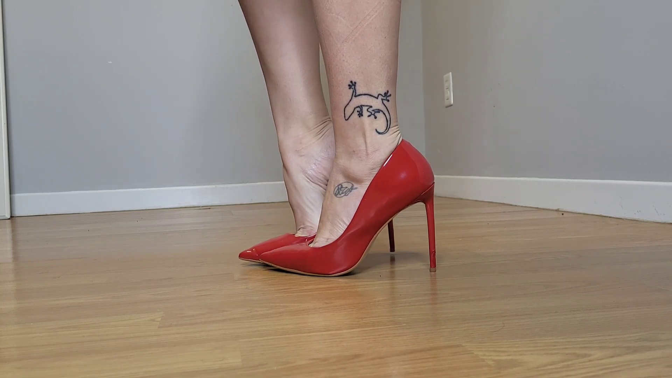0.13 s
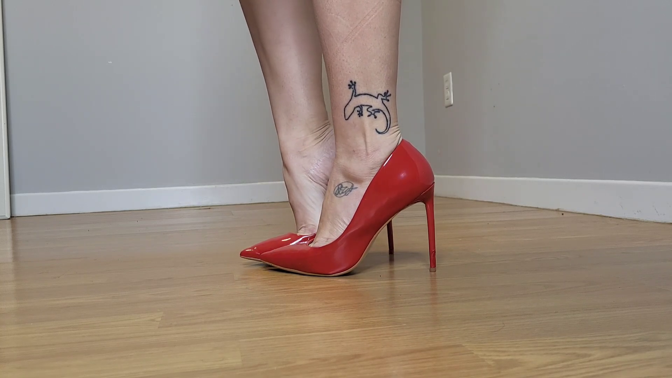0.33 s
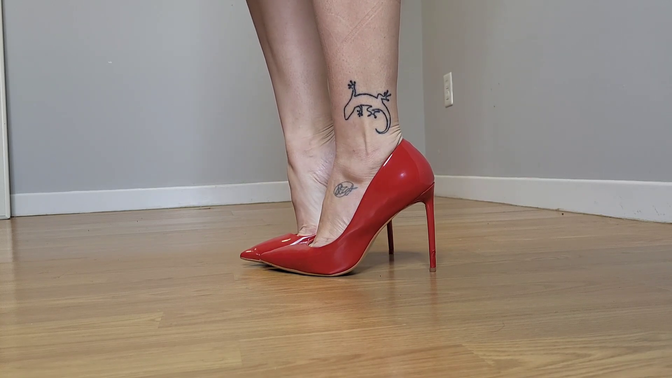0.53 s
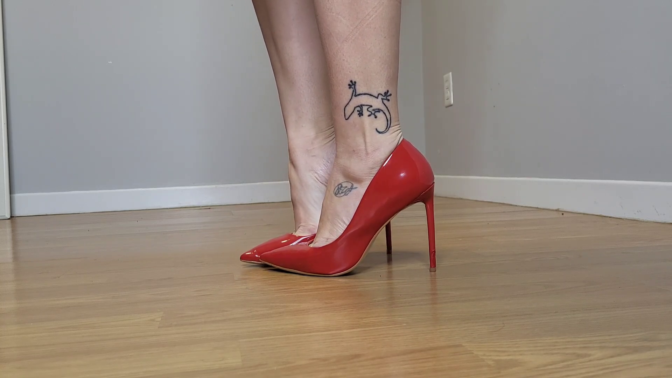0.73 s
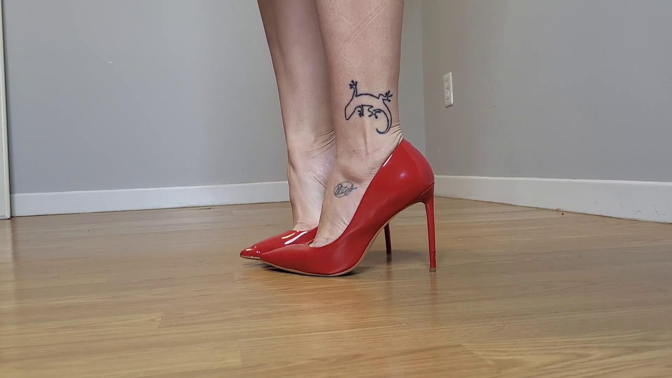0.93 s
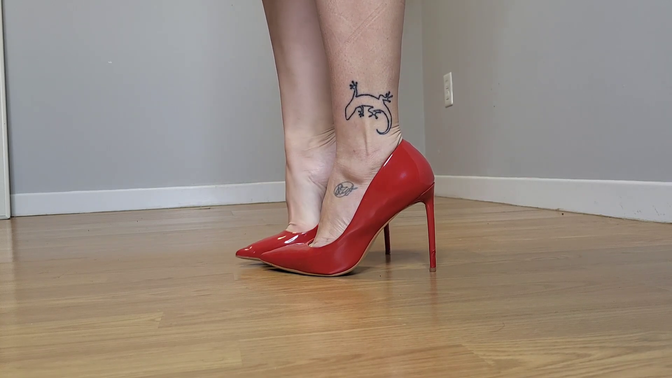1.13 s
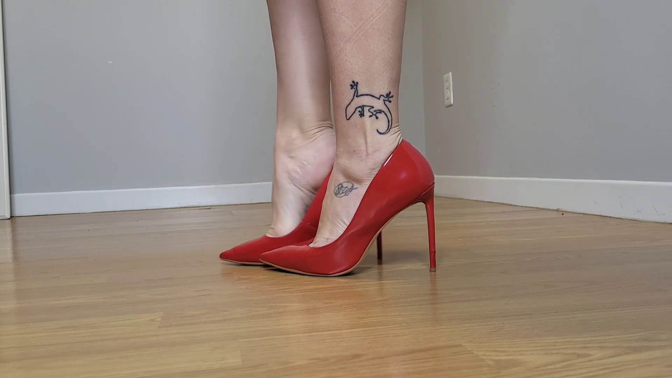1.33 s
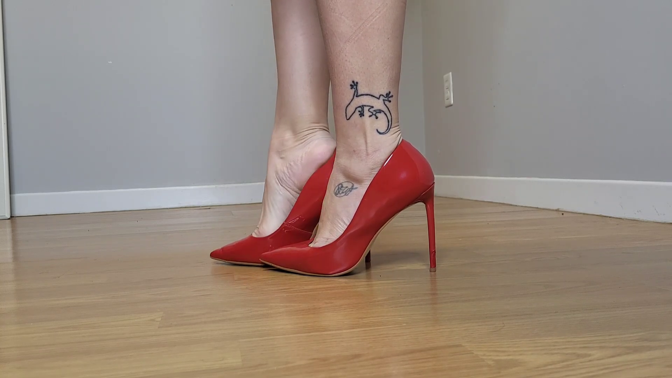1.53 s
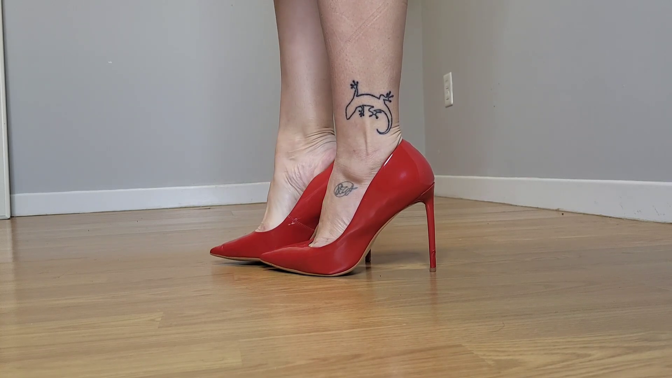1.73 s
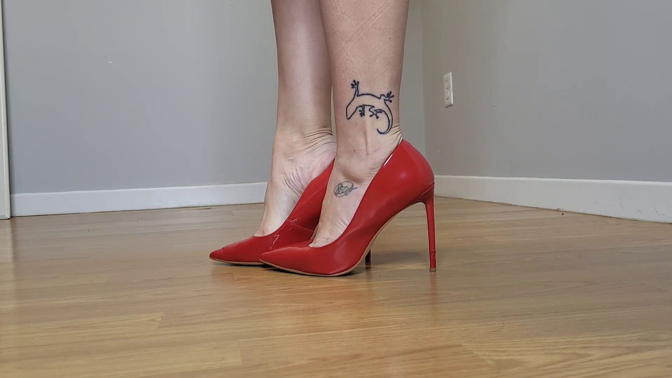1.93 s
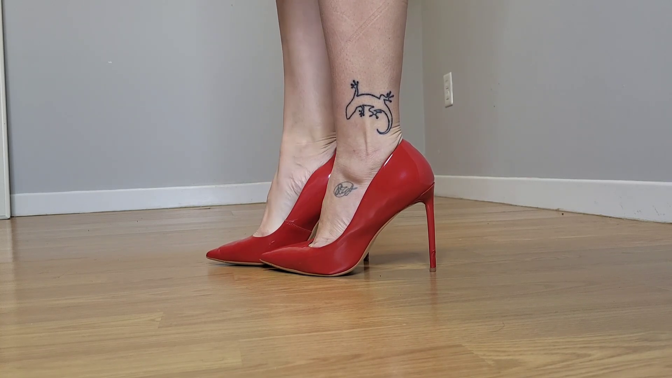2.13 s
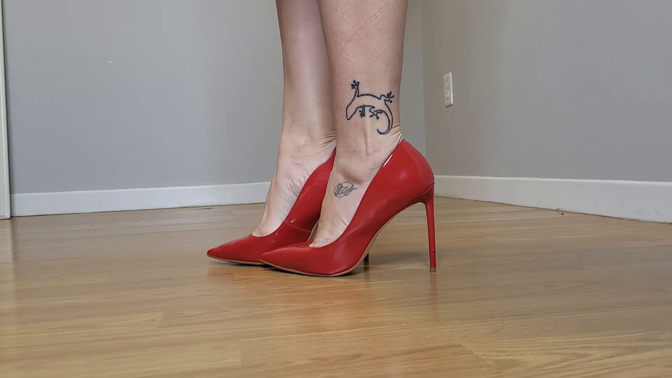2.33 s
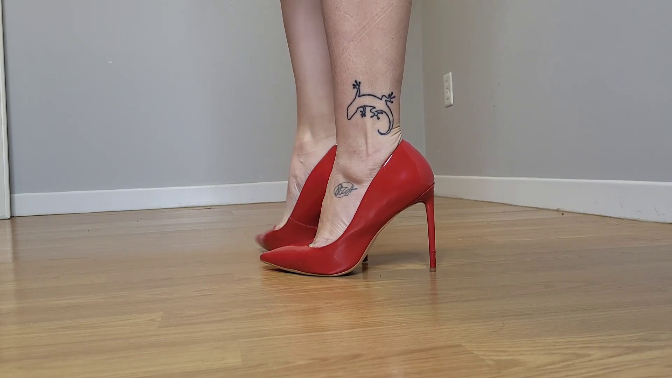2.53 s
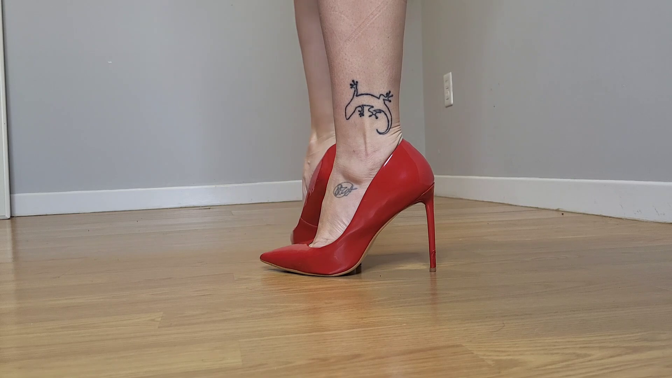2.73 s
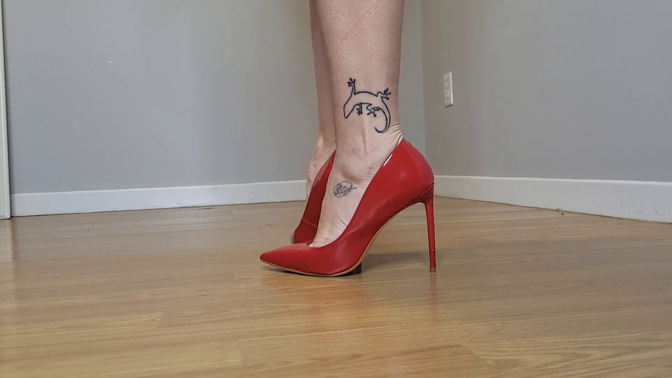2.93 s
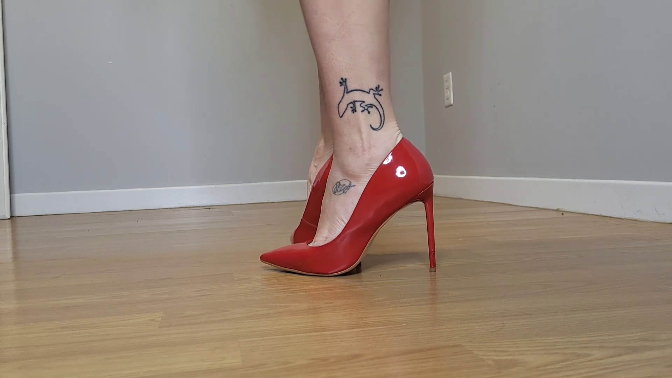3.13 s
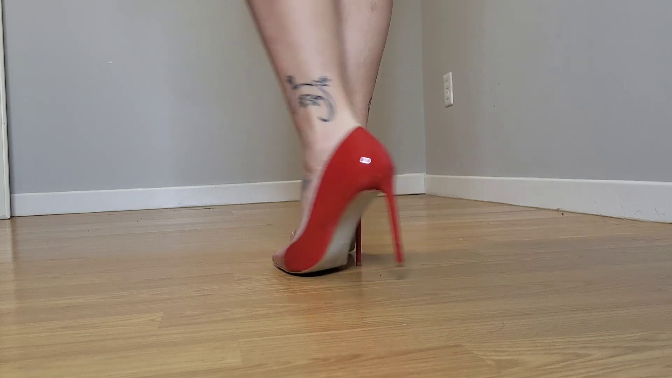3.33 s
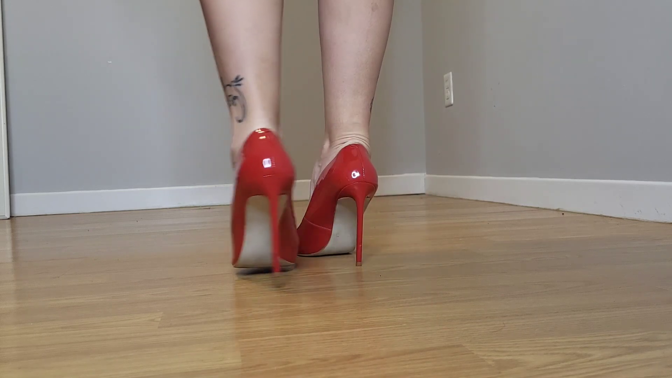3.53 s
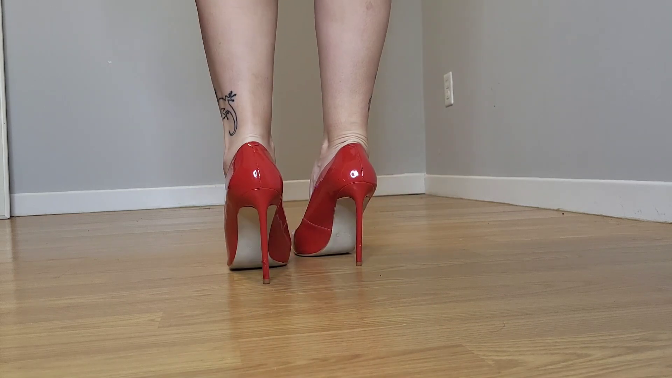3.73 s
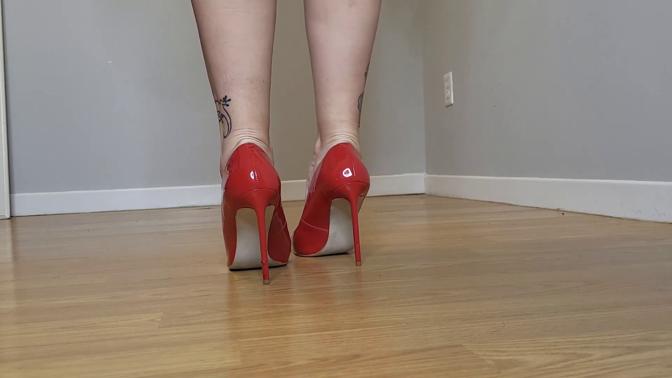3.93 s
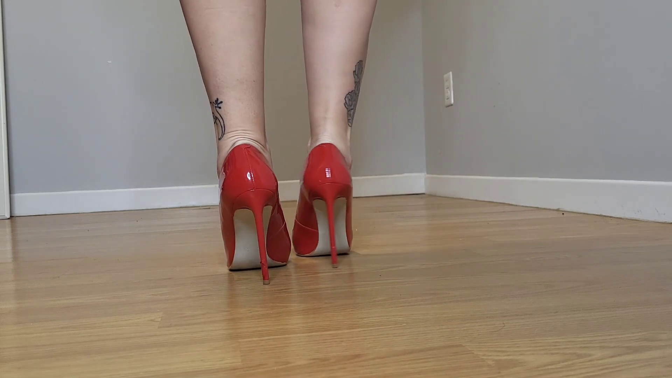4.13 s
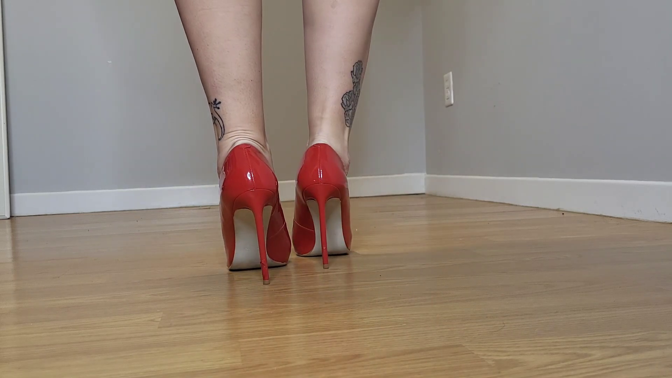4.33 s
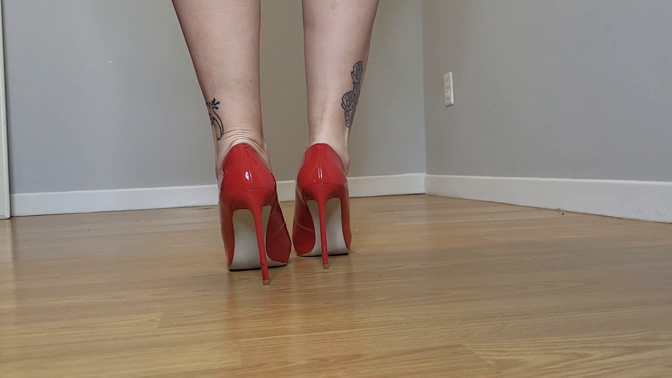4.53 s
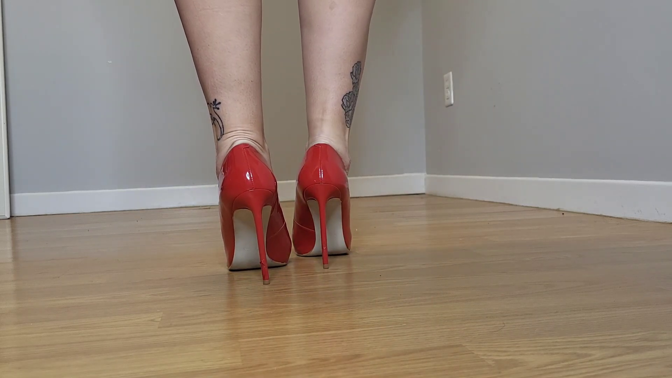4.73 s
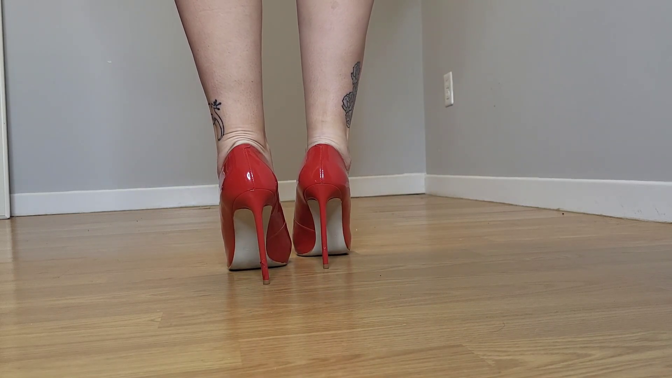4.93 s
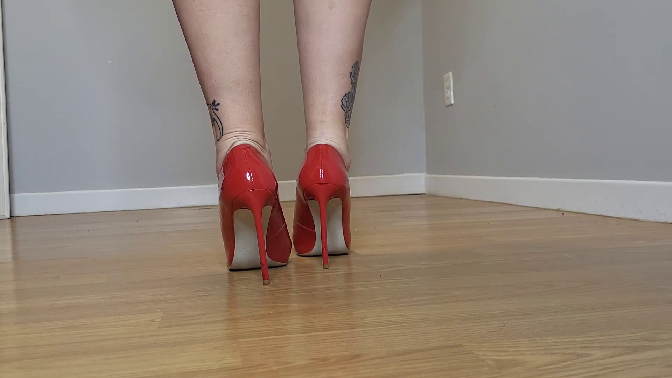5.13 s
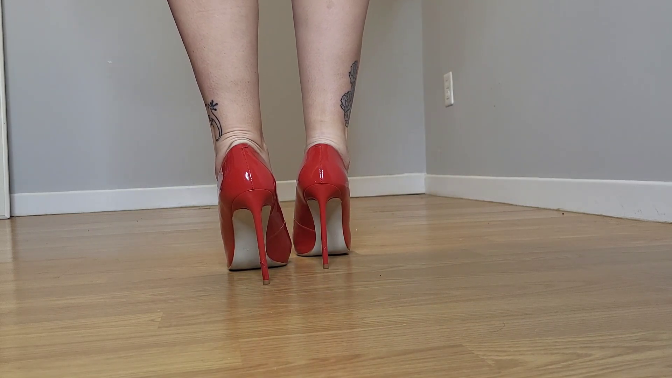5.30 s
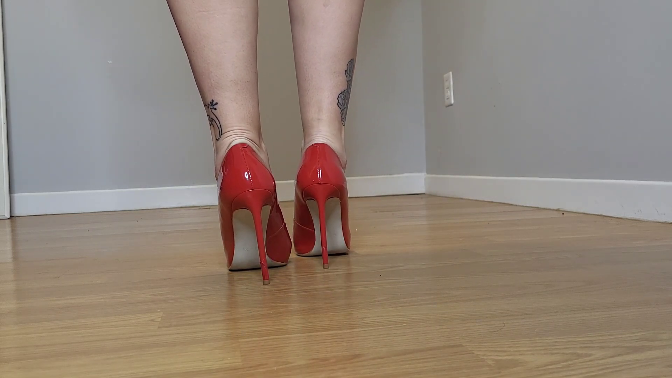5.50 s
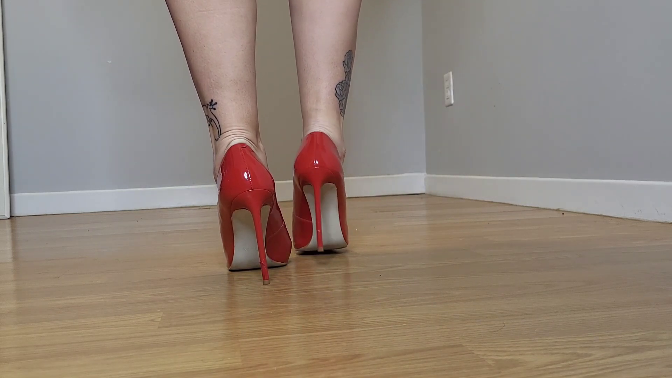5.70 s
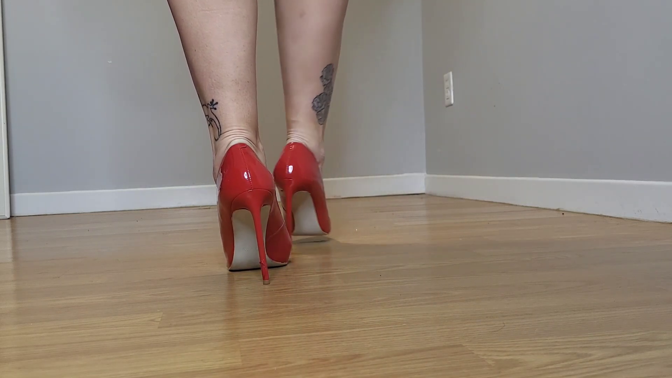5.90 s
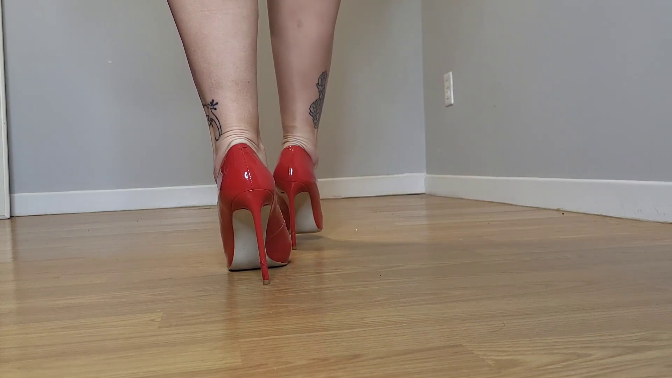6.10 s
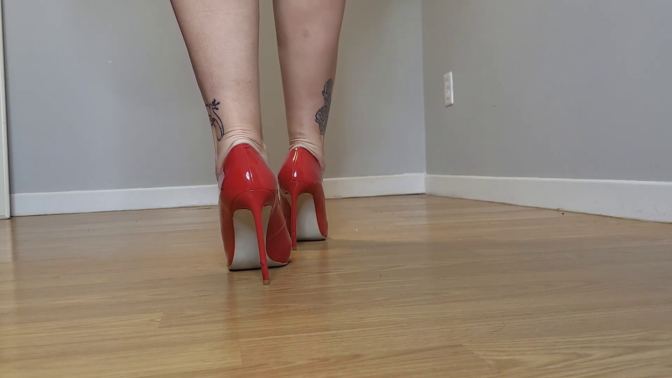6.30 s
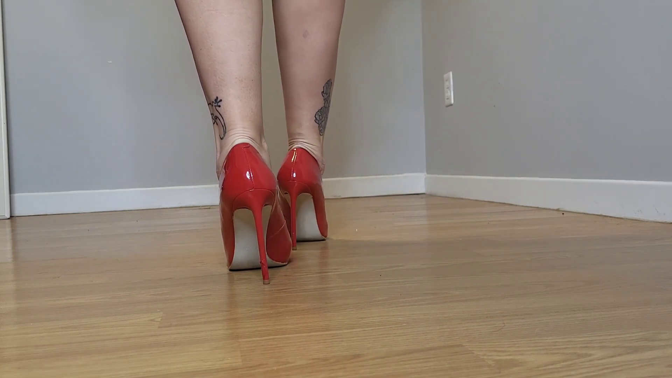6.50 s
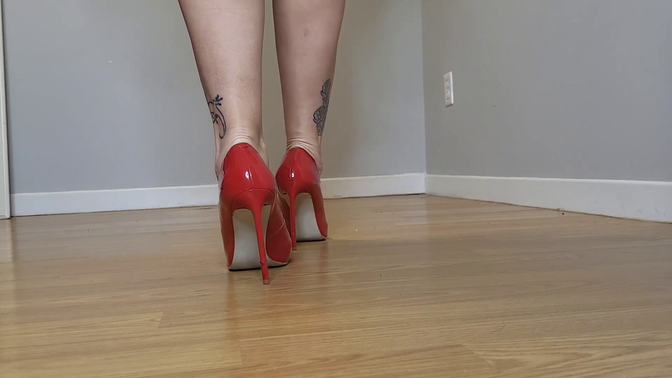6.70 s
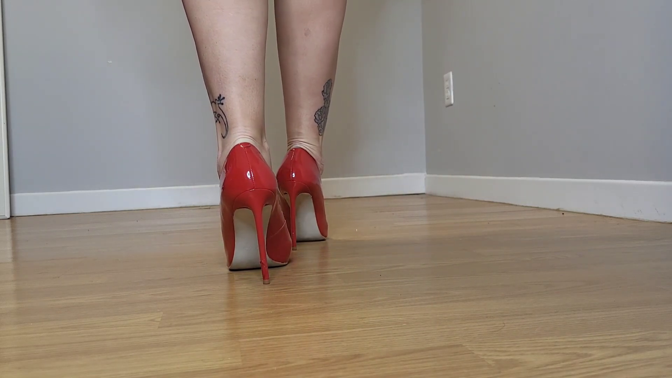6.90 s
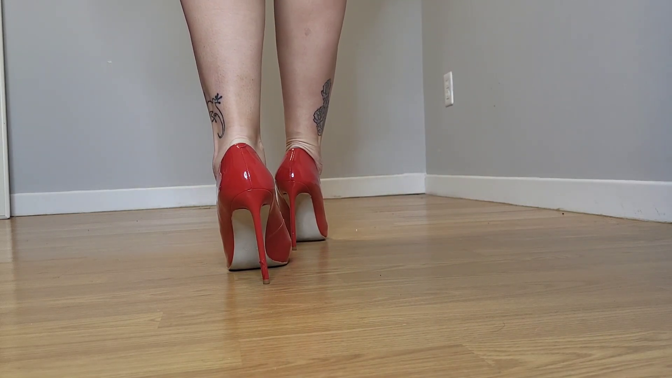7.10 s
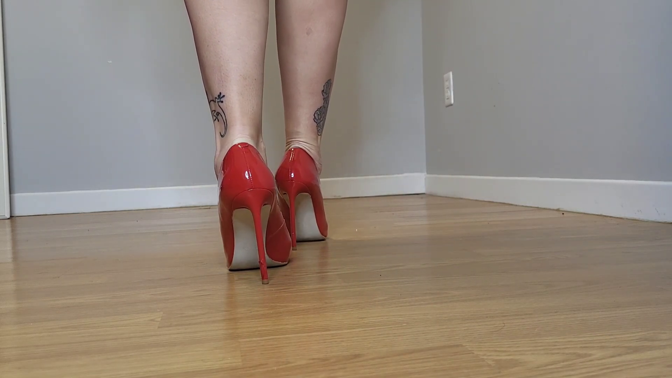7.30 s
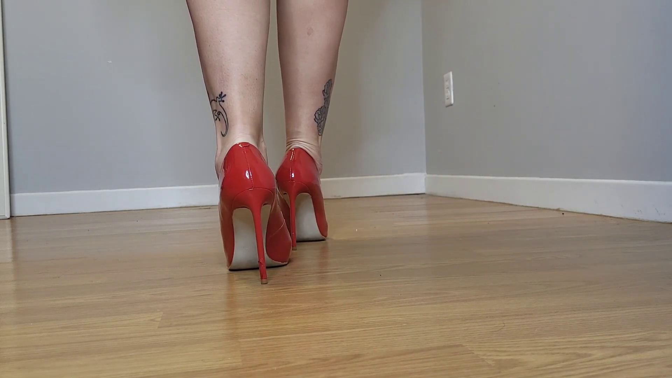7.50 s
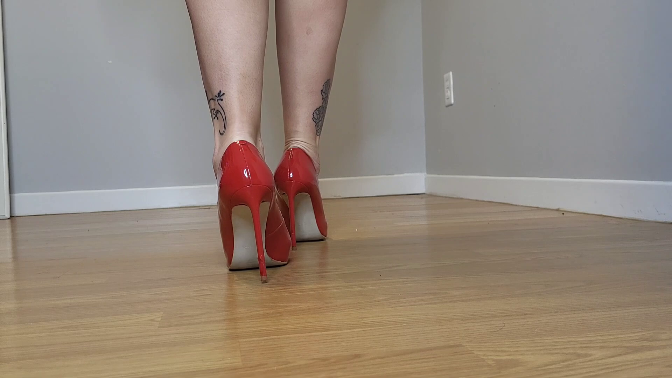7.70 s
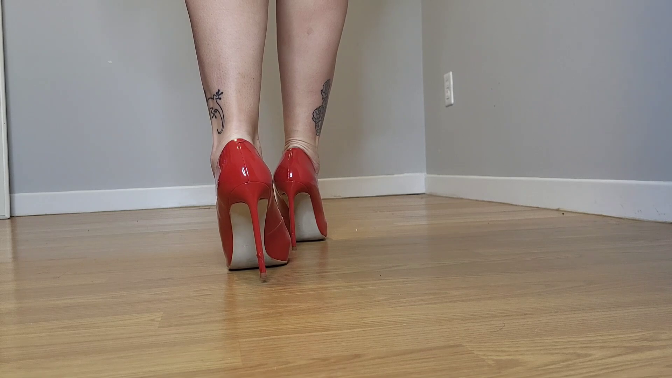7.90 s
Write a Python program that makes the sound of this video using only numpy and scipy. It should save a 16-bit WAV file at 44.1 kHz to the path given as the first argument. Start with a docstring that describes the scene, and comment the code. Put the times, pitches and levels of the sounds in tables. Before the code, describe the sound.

Stiletto heels tap and thump unevenly on hollow indoor boards, soles dragging briefly between steps, over faint room rumble and hiss.

```python
"""Bare room, hollow laminate floor: feet work their way into high-heeled shoes, then turn and step.
Heel tips and soles ring modes of shoe and plank (tick, knock); the boards add a slower swelling thud.
Soles drag and swivel as dense uneven catches of noise; decaying noise echoes are the room's answer.
Building rumble, a wavering low hum, flexing boards and microphone hiss, all shaped noise, lie under it."""
import sys
import numpy as np
from scipy import signal
from scipy.io import wavfile

SR = 44100
rng = np.random.default_rng(int(sys.argv[2]) if len(sys.argv) > 2 else 0)


def persist_wave(psi):
    """Save psi, clipped to +-1, as 16-bit WAV."""
    counts = np.round(np.clip(psi, -1, 1) * 32767).astype(np.int16)
    wavfile.write(sys.argv[1], SR, np.atleast_2d(counts).T)


N = 350580

# Heel tips and sole edges striking: (time [s], knock level [dB], knock pitch [Hz], tick level [dB],
# tick pitch [Hz], crack level [dB], thud level [dB], thud pitch [Hz])
TAPS = [(0.009, -47, 733, -81, 1420, -56, -80, 315), (0.036, -86, 815, -66, 1520, -52, -51.5, 224),
        (0.089, -56, 750, -55.5, 2970, -55, -68, 222), (0.124, -61, 750, -83, 1500, -72, -62, 200),
        (0.267, -35.5, 484, -93, 1440, -65, -31, 232.6), (0.373, -55, 556, -76, 1660, -75, -58, 191),
        (0.511, -58, 475, -65, 1780, -81, -52.5, 213), (0.575, -43, 654, -53.5, 1670, -57, -40, 220),
        (0.938, -53, 524, -84, 1580, -67, -70, 248), (1.097, -47, 500, -75, 1410, -73, -68, 280),
        (1.15, -51, 690, -84, 1500, -80, -67, 280), (1.186, -39.5, 750, -71, 1440, -59, -69, 194),
        (1.323, -54, 730, -65, 1540, -47, -51.5, 246), (1.369, -41, 444, -61, 1640, -62, -32, 220),
        (1.688, -58, 573, -65, 1470, -69, -49.5, 198), (1.827, -47.5, 553, -52.5, 1520, -54.5, -40.5, 214),
        (1.885, -50, 550, -56, 1760, -56, -42.5, 190), (1.927, -51, 573, -62, 1430, -57.5, -44.5, 194),
        (1.962, -64, 458, -63, 1480, -71, -47, 223), (2.001, -45.5, 490, -57.5, 1480, -56.5, -46, 146),
        (2.0544, -24, 614, -29, 2470, -29, -26.5, 220), (2.515, -50, 470, -71, 2090, -65, -48, 228),
        (2.746, -36.5, 422, -79, 1460, -56, -29.5, 213), (2.785, -44, 450, -63, 1440, -57, -55, 214),
        (3.196, -41, 746, -67, 2020, -50, -39.5, 249), (3.403, -49, 387, -75, 3530, -56.5, -40.5, 200),
        (3.495, -54, 423, -52.5, 2900, -57, -43, 300), (3.6734, -31, 506, -32.5, 2690, -39.5, -15, 209.6),
        (3.72, -22.5, 444, -48, 1510, -46.5, -13.5, 180.4), (3.963, -67, 746, -80, 1310, -59, -58, 221),
        (4.108, -42.5, 445, -58, 3800, -68, -48, 207), (5.512, -36, 418, -45.5, 2320, -45.5, -36.5, 227),
        (6.1149, -29, 427, -49.5, 2280, -56, -19, 222.5), (6.222, -63, 745, -64, 3500, -56, -56, 220),
        (6.255, -37, 650, -52, 930, -47.5, -34.5, 159), (6.566, -65.5, 715, -82, 1220, -59, -55, 214),
        (6.72, -80, 750, -79, 1260, -85, -81, 220), (7.049, -86, 750, -80, 1210, -64, -54.5, 259),
        (7.186, -42, 696, -48, 2070, -46.5, -36.5, 217), (7.471, -55.5, 404, -67, 2360, -75, -45.5, 238)]
# Colour of sole grinding through the boards, also of the boards flexing: (frequency [Hz], level [dB per Hz])
GRIND = [(59, -52), (100, -14), (226, 4.5), (342, -1), (491, -1), (650, -2.5), (880, -12), (1200, -16.5),
         (2000, -24), (4400, -78)]
EARLY_DB = 8   # lift of the first rounds of echoes over the later decay


def amp(db):
    """Decibels to gain."""
    return 10 ** (np.asarray(db) / 20)


def rms_one(x):
    """Scale to unit power."""
    return x / np.sqrt(np.mean(x ** 2) + 1e-20)


def at_hz(rows, hz, axis=1):
    """Read one column of a table on a log-frequency axis."""
    rows = np.array(rows)
    return np.interp(np.log(hz), np.log(rows[:, 0]), rows[:, axis])


def drift(rate_hz):
    """Slow random wander of unit power: noise through two equal poles, made at SR / 40."""
    r = np.exp(-80 * np.pi * rate_hz / SR)
    noise = rng.standard_normal(N // 40 + 2002)
    slow = signal.lfilter([1], [1, -2 * r, r * r], noise)[2000:]   # without the filter's start
    return np.interp(np.arange(N) / 40, np.arange(len(slow)), rms_one(slow))


def bands(sources):
    """Half-octave bands, dealt in turn from the sources: yields centre in Hz and band."""
    edges = 22 * 2 ** np.arange(0, 10, .5)
    for k, (low, high) in enumerate(zip(edges, edges[1:])):
        sos = signal.butter(2, [low, high], "band", fs=SR, output="sos")
        yield np.sqrt(low * high), signal.sosfilt(sos, sources[k % len(sources)])


def spread(pair, alike):
    """Mix two unrelated signals into left and right whose correlation is alike, at least -0.15."""
    alike = np.clip(alike, -.15, 1)
    middle = np.sqrt(1 + alike) * pair[0]
    side = np.sqrt(1 - alike) * pair[1]
    return middle + side * [[1], [-1]]


def peak(x, hz, db, q):
    """Bell-shaped lift or cut by a two-pole filter."""
    a, w = amp(db / 2), 2 * np.pi * hz / SR
    k = np.sin(w) / (2 * q)
    return signal.lfilter([1 + k * a, -2 * np.cos(w), 1 - k * a], [1 + k / a, -2 * np.cos(w), 1 - k / a], x)


def ringing(modes, t, strength_db):
    """Decaying sines of a mode table, each with its own strength."""
    hz, db, t60 = np.transpose(modes)[:, :, None]
    decay = amp(db + strength_db[:, None] - 60 * t / t60)
    return np.sum(decay * np.sin(2 * np.pi * hz * t), axis=0)


def nearness_db(modes, hz, db_per_octave):
    """A blow drives hardest the modes nearest its own pitch."""
    return -db_per_octave * np.abs(np.log2(np.array(modes)[:, 0] / hz))


def early(t):
    """One during the first rounds of echoes, then quickly zero."""
    end_s, edge_s = 0.071, 0.014   # where that stage ends, and how softly
    return 1 / (1 + np.exp(np.clip((t - end_s) / edge_s, -50, 50)))


def tips():
    """Knock and tick ring in the shoe and plank; the hard tip adds one broad crack."""
    # Modes of shoe and plank under a blow: (frequency [Hz], level [dB], t60 [s])
    knock_modes = [(449, 9.5, 0.011), (589, 3.5, 0.018), (764, 9, 0.013), (946, 4.5, 0.012),
                   (1196, 13, 0.012), (1540, 13, 0.0089), (1800, 10.5, 0.0056), (2270, 13.5, 0.0036),
                   (2810, 6.5, 0.0051), (3345, -1, 0.0066), (4660, -23, 0.0044)]
    out, t = np.zeros(N + SR), np.arange(2000) / SR
    chance = rng.standard_normal((len(TAPS), len(knock_modes)))
    edge = signal.butter(2, [3500, 13000], "band", fs=SR, output="sos")
    crack = signal.sosfilt(edge, -np.exp(-t / .00005))
    crack /= np.abs(crack).max()
    closing = 1 - np.exp(-t / 0.00059)   # the contact takes a moment to close
    for (s, knock_db, knock_hz, tick_db, tick_hz, crack_db, *_), draw in zip(TAPS, chance):
        low = amp(knock_db + nearness_db(knock_modes, knock_hz, 21.7))
        high = amp(tick_db + nearness_db(knock_modes, tick_hz, 16.0))
        strength_db = 20 * np.log10(low + high) + 1.5 * draw   # no two blows ring alike
        ring = ringing(knock_modes, t, strength_db)
        i = round(s * SR)
        out[i:i + len(t)] += amp(crack_db) * crack - closing * ring
    return out[:N]


def boards():
    """The swelling thud of the boards, and the standing waves and joists that it sets going."""
    # Soles settling softly, thud alone: (time [s], thud level [dB], thud pitch [Hz])
    settles = [(1.242, -37.5, 203), (2.018, -41, 202), (2.378, -48.5, 232), (2.635, -40, 222),
               (3.547, -44.5, 236), (4.491, -55.5, 256), (6.275, -30.5, 161)]
    # Body weight landing on the joists: (time [s], level [dB])
    weight = [(0.267, -56), (1.369, -56), (1.689, -57), (1.826, -57.5), (1.885, -54.5), (2.635, -67),
              (3.194, -54.5), (3.493, -47), (3.547, -67), (3.673, -42), (6.115, -51), (6.252, -45),
              (7.184, -58)]
    # Lowest standing waves of room and floor cavity: (frequency [Hz], level [dB], t60 [s])
    boom_modes = [(126, -32.5, 0.47), (153, -46.5, 0.53), (177.3, -14, 0.22), (183, -25, 0.73),
                  (242, -38, 0.94), (289.5, -25, 0.62)]
    peak_s, sharpness = 0.00913, 5.5   # when the thud is fullest, and how narrow its swell
    joist_hz, joist_t60_s = 80, 0.45
    boom_over_thud_db = 3.5
    thuds = [(row[0], *row[-2:]) for row in TAPS] + list(settles)
    thud, boom, t = np.zeros(N + SR), np.zeros(N + SR), np.arange(SR // 2) / SR
    chance = rng.standard_normal((len(thuds), len(boom_modes)))
    swell = (t / peak_s * np.exp(1 - t / peak_s)) ** sharpness   # bending waves gather, then leave
    build = (1 - np.exp(-t / 0.023)) ** 2 * amp(EARLY_DB * early(t))
    joists = amp(-60 * t / joist_t60_s) * np.sin(2 * np.pi * joist_hz * t)
    for (s, thud_db, thud_hz), draw in zip(thuds, chance):
        i = round(s * SR)
        thud[i:i + len(t)] += amp(thud_db) * swell * np.sin(2 * np.pi * thud_hz * (t - peak_s))
        waves = ringing(boom_modes, t, nearness_db(boom_modes, thud_hz, 7.4) + 0.79 * draw)
        boom[i:i + len(t)] += build * amp(thud_db + boom_over_thud_db) * waves
    for s, weight_db in weight:
        i = round(s * SR)
        boom[i:i + len(t)] += build * amp(weight_db) * joists
    return thud[:N], boom[:N]


def grit(spectrum, per_s, uneven_db, lumpy_db):
    """Dense uneven catches of sole on grain, coloured by the body that they shake; rms 1."""
    signs = rng.choice([-1, 1], (2, N))
    sizes = amp(uneven_db * np.minimum(rng.exponential(1, (2, N)), 5)) * signs
    catches = sizes * (rng.random((2, N)) < per_s / SR) + 1e-18
    lowest_hz, highest_hz = spectrum[0][0], spectrum[-1][0] * 1.2
    out = np.zeros(N)
    for hz, band in bands(catches):
        if lowest_hz < hz < highest_hz:
            out += amp(at_hz(spectrum, hz)) * band
    return rms_one(out * amp(lumpy_db * drift(25)))


def drags():
    """Each stroke swells, holds and dies; it grinds through the boards and rubs in the air, each in its own share."""
    # Soles dragging, one row a stroke: (start [s], swell [s], hold [s], rub of the sole [dB],
    # grind through the boards [dB], sheen of the rub [dB])
    strokes = [(0.0, 0.01, 0.097, -97, -75, -84), (0.579, 0.0079, 0.037, -85, -61, -88),
               (1.094, 0.061, 0.068, -96, -58, -83), (1.175, 0.03, 0.048, -72.5, -56, -75.5),
               (1.304, 0.039, 0.03, -70.5, -63, -69.5), (1.356, 0.016, 0.078, -68, -45.5, -70.5),
               (1.896, 0.027, 0.015, -82, -70, -106), (2.035, 0.014, 0.018, -63.5, -38.5, -78),
               (2.336, 0.012, 0.034, -83, -82, -82.5), (2.583, 0.031, 0.026, -85, -72.5, -83),
               (3.116, 0.086, 0.032, -76, -56.5, -77), (3.24, 0.031, 0.07, -88, -78.5, -75.5),
               (3.493, 0.011, 0.026, -78.5, -72.5, -81.5), (3.951, 0.05, 0.1, -72, -68, -73),
               (4.068, 0.014, 0.14, -76.5, -67.5, -81.5), (4.741, 0.029, 0.03, -92, -85, -86),
               (5.328, 0.068, 0.029, -100, -75.5, -100), (5.663, 0.027, 0.033, -93, -77, -81),
               (6.276, 0.015, 0.027, -80, -66.5, -82.5), (6.34, .04, .15, -101, -92, -89)]
    # Colour of the rub in the air: (frequency [Hz], level [dB per Hz])
    rub_colour = [(710, -28), (1200, -4.5), (1480, -3), (2010, -7.5), (4540, -3.5), (5500, -39),
                  (7150, -21), (12100, -120)]
    # Colour of its treble sheen: (frequency [Hz], level [dB per Hz])
    sheen_colour = [(3240, -6.5), (5500, 1.5), (8020, -3.5), (9330, -2.5), (15100, 2), (15500, -9)]
    release_db_per_s = 348.5   # how fast a stroke dies as the sole comes to rest
    t, levels = np.arange(N) / SR, np.zeros((3, N))
    for s, swell_s, hold_s, *shares_db in strokes:
        swell = np.clip((t - s) / max(swell_s, .002), 0, 1) ** 2
        release = amp(-release_db_per_s * np.clip(t - s - swell_s - hold_s, 0, 1))
        levels += swell * release * amp(shares_db)[:, None]
    grind = grit(GRIND, per_s=1100, uneven_db=3.5, lumpy_db=1.0)
    rub = grit(rub_colour, per_s=6000, uneven_db=2.5, lumpy_db=1.5)
    sheen = grit(sheen_colour, per_s=12000, uneven_db=2, lumpy_db=1.2)
    return levels[0] * rub + levels[1] * grind + levels[2] * sheen


def room(x):
    """Bare walls: dense echoes that die band by band and differ between the ears in the treble."""
    # Diffuse answer of the room: (frequency [Hz], level [dB], t60 [s], left-right likeness [-1 to 1],
    # build-up [s])
    answer_rows = [(151, -7.5, 0.35, 0.71, 0.0059), (298, -9, 0.46, 1, 0.0031),
                   (710, -4.5, 0.43, 0.1, 0.0093), (1500, -8, 0.44, 0.056, 0.0071),
                   (3000, -3.5, 0.47, .02, 0.0047), (5560, 2.5, 0.56, 0.01, 0.001),
                   (12500, -6.5, 0.52, 0.01, .002)]
    t = np.arange(int(.6 * SR)) / SR
    echoes = 0
    for hz, pair in bands(rng.standard_normal((2, 2, len(t)))):
        t60 = at_hz(answer_rows, hz, axis=2)
        unit_energy = np.sqrt(2 * np.log(1000) / (t60 * SR))   # a longer decay is no stronger in sum
        fall = amp(at_hz(answer_rows, hz) - 60 * t / t60) * unit_energy
        fall *= np.clip(t / at_hz(answer_rows, hz, axis=4), 0, 1) ** 2   # echoes thicken after the direct sound
        echoes = echoes + fall * spread(pair, at_hz(answer_rows, hz, axis=3))
    echoes = echoes * amp(EARLY_DB * early(t))
    return signal.fftconvolve(x[None], echoes, axes=1)[:, :N]


def stillness():
    """Rumble and hiss of the still room, a wavering low hum, and boards flexing: noise in shaped bands."""
    # Colour of the still room: (frequency [Hz], level [dB per Hz])
    still_colour = [(15, -40), (25, -0.5), (96, -2), (129, -40), (221, -11), (267, -25), (306, -7),
                    (341, -25), (379, -13.5), (471, -25), (744, -30.5), (2070, -28), (4060, -32),
                    (7960, -35), (15600, -33.5)]
    # How alike the two capsules hear it: (frequency [Hz], left-right likeness [-1 to 1])
    still_likeness = [(60, 0.63), (240, 0.83), (950, -0.2), (3770, -0.3), (15000, 0)]
    # Boards flexing as weight shifts: (time [s], level [dB])
    flex_rows = [(0.0, -69), (1.08, -66), (1.3, -72), (1.75, -66.5), (2.06, -66.5), (2.21, -67.5),
                 (2.79, -67.5), (3.03, -76), (3.74, -63), (4.72, -79), (6.09, -75.5), (6.24, -72),
                 (6.62, -75.5), (7.95, -75)]
    still_db = -70.5
    hum_hz, hum_width_hz, hum_db = 94.1, 4.7, -71.5
    s, flex_db = np.transpose(flex_rows)
    flex = amp(np.interp(np.arange(N) / SR, s, flex_db) + 2.0 * drift(0.98))
    still, creak = 0, 0
    for hz, pair in bands(rng.standard_normal((2, 2, N))):
        band = spread(pair, at_hz(still_likeness, hz))
        still = still + amp(at_hz(still_colour, hz) + 1.0 * drift(6.1)) * band
        if 100 < hz < 1500:   # flexing is duller than the grind: 7.7 dB less per octave
            creak = creak + amp(at_hz(GRIND, hz) - 7.7 * np.log2(hz / 200)) * band
    r = np.exp(-np.pi * hum_width_hz / SR)
    resonance = [1, -2 * r * np.cos(2 * np.pi * hum_hz / SR), r * r]
    hum = signal.lfilter([1, 0, -1], resonance, rng.standard_normal(N))
    return amp(still_db) * rms_one(still) + flex * rms_one(creak) + amp(hum_db) * rms_one(hum)


def scene():
    """Taps and drags, direct and through the room, over the stillness."""
    thud, boom = boards()
    late_boom = np.r_[np.zeros(9), boom[:-9]]
    wide = np.array([late_boom, boom])   # standing waves reach the left capsule 9 samples late
    shoes = tips() + drags()
    answer = room(shoes + amp(-7.0) * thud)   # the thud arrives mostly through the floor
    direct = peak(shoes, 11000, -4.5, 0.72)   # foot and shoe shade the treble on the direct path
    near = (direct + thud) * amp([[-.4], [.4]])   # a little stronger on the right
    return near + wide + answer + stillness()


def record(dry):
    """The right capsule is brighter than the left; the deepest bass and the top are cut."""
    cutoff_hz = 15750
    left = peak(dry[0], 12500, -4.5, 0.5)
    right = peak(dry[1], 7900, 9.34, 4.3)
    thin = signal.sosfilt(signal.butter(2, 45, "high", fs=SR, output="sos"), [left, right])
    return signal.sosfilt(signal.ellip(12, .3, 70, cutoff_hz, fs=SR, output="sos"), thin)


dry = scene()
out = record(dry)
persist_wave(out)
```